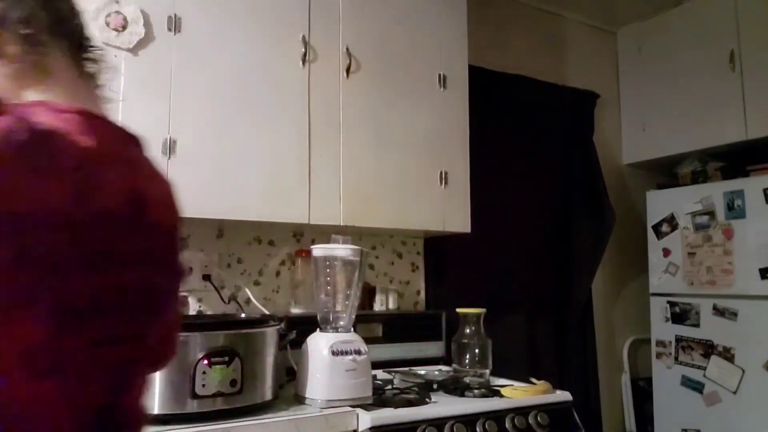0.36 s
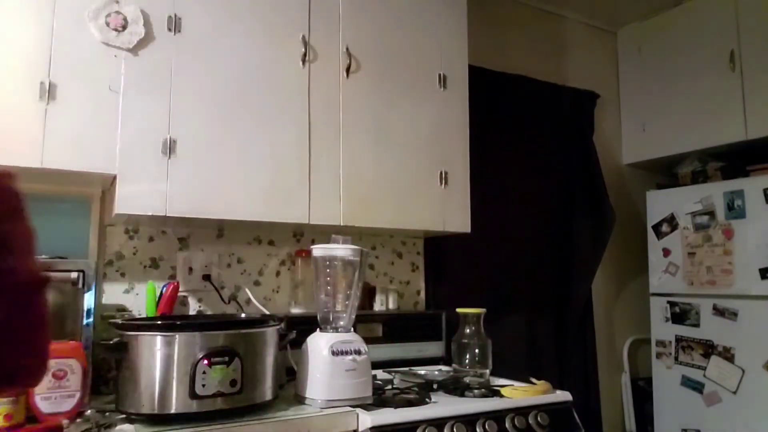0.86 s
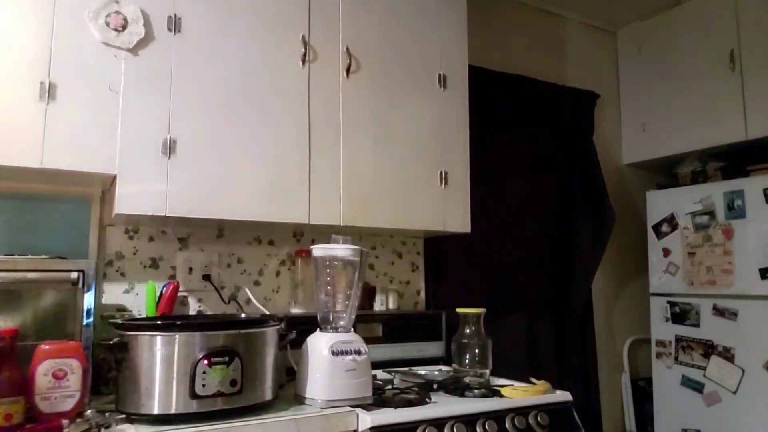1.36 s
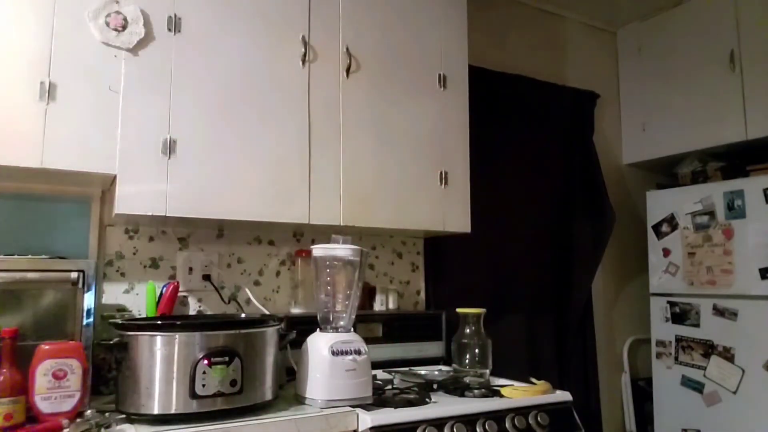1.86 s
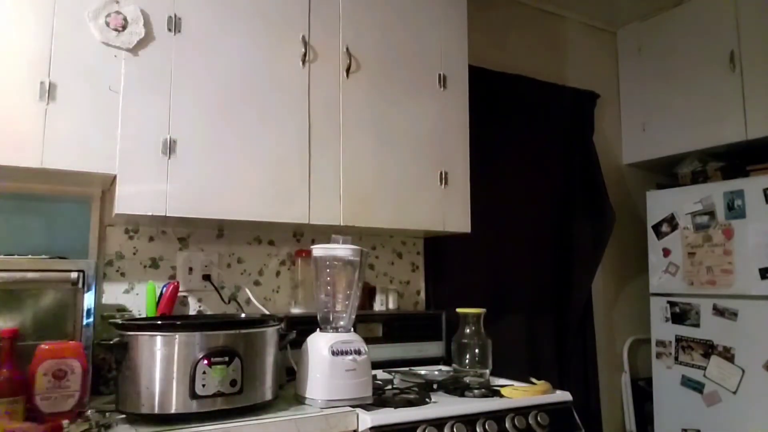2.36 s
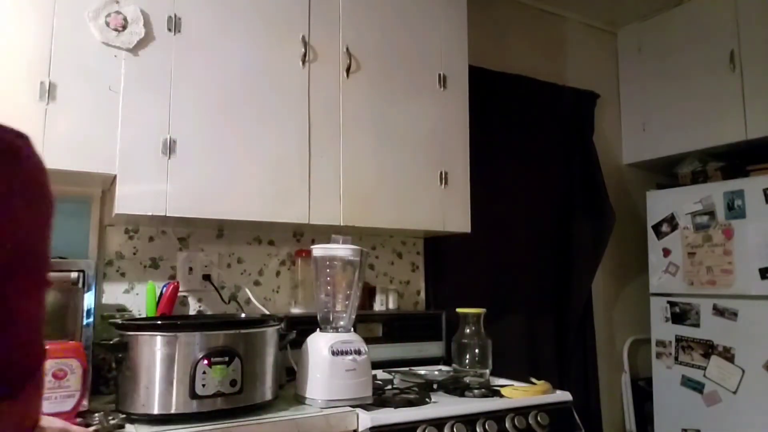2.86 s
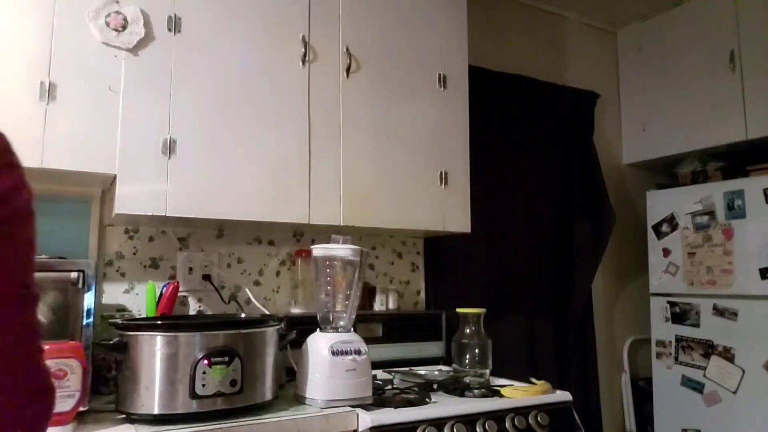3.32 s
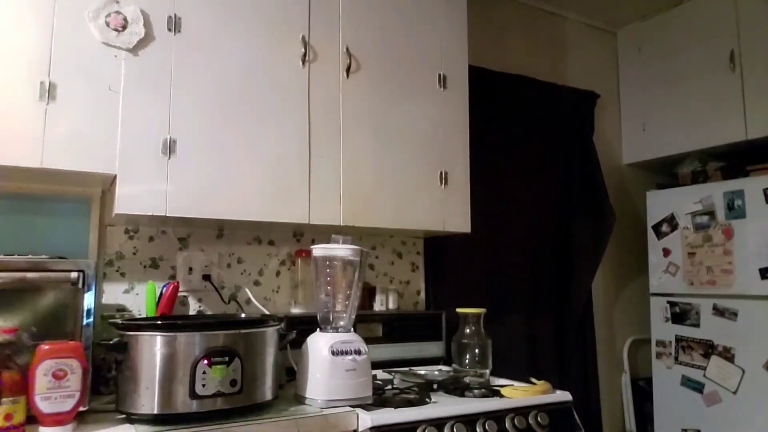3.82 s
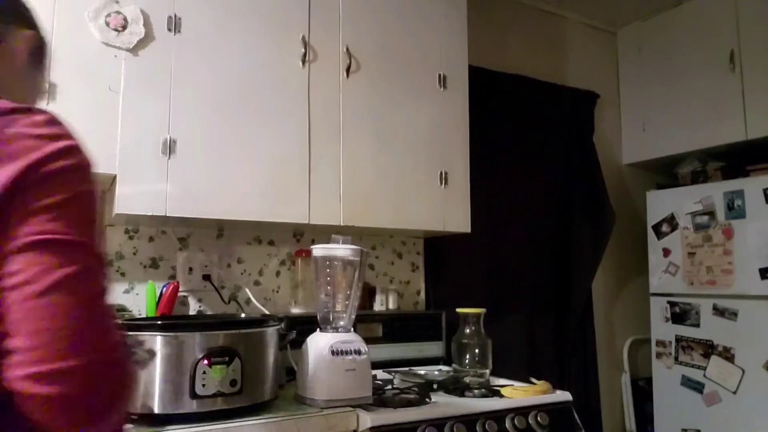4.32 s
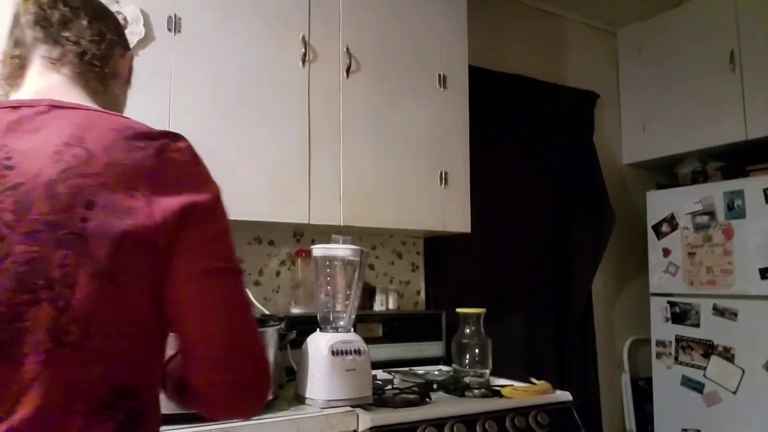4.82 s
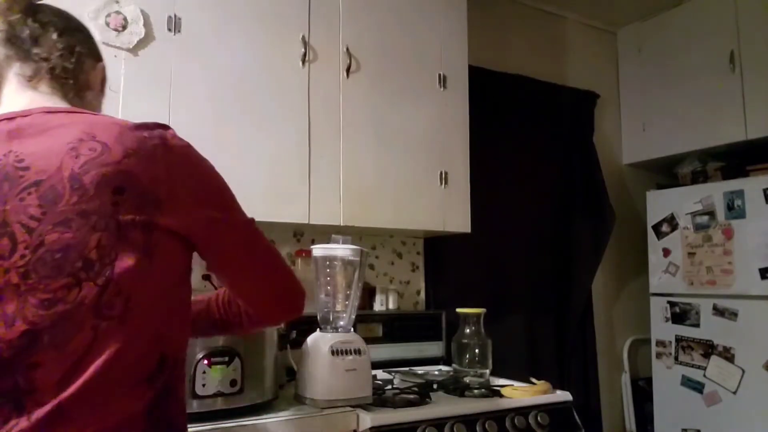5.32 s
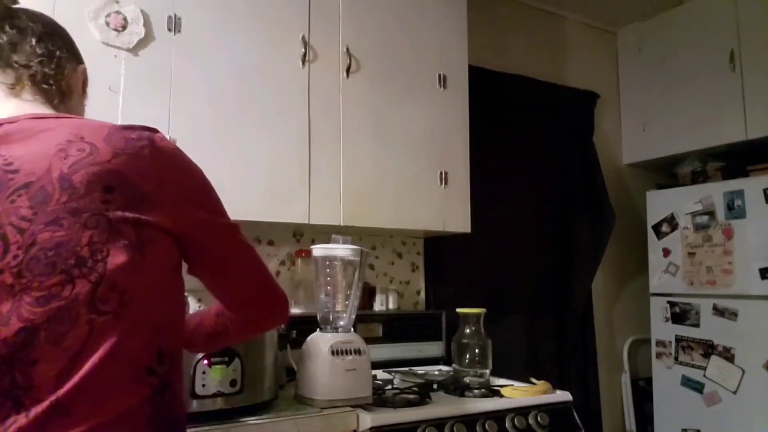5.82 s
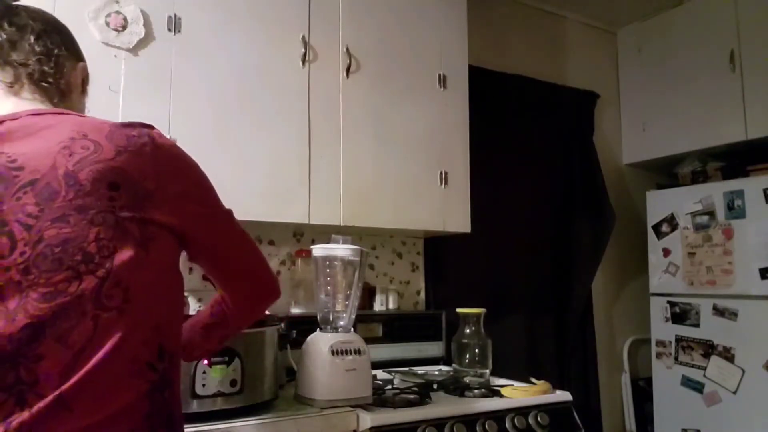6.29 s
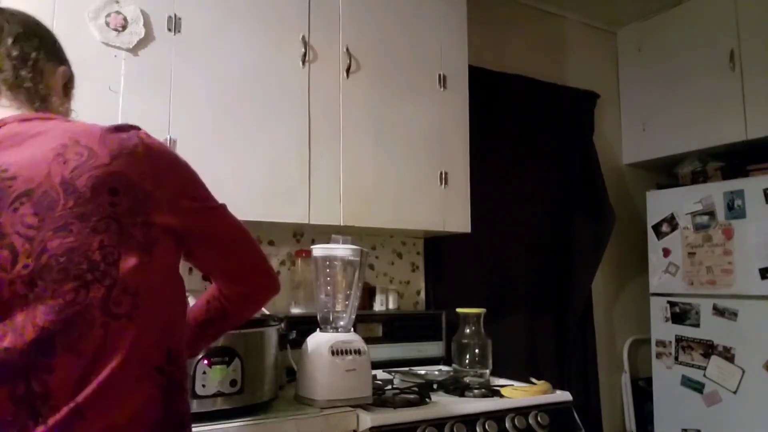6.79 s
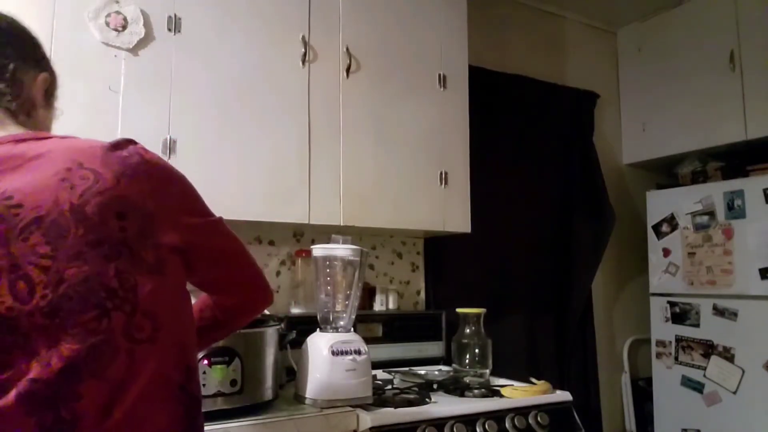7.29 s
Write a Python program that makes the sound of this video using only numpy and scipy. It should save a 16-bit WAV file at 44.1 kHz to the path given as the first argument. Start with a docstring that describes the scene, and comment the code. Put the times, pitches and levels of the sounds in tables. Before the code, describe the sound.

Close in a small kitchen, a dish is set down with a quick clatter, then a jar lands with a firm clunk. Plastic snaps and sleeves rustle. A door knocks dully twice, a lid clacks with a tiny squeak, and a wooden board takes a cluster of thuds. Quiet spoon ticks and soft slosh follow, then a metal pot is struck brightly, and a dish knocks at the end.

```python
"""A dish is set down with a run of knocks in a small kitchen, and a jar follows. Plastic snaps and dull
knocks of board and dish come throughout, with door knocks near 2.1 s, lid knocks, soft floor thumps and
spoon ticks among them, and a metal pot struck near 6.6 s. Each blow is a click and a dying wash of
noise, coloured by the object's resonances. Hands, sleeves and poured liquid rumble, slosh and rustle
as shaped noise, and one thin sine squeaks. Two spaced microphones hear it."""
import sys
import numpy as np
from scipy import signal
from scipy.fft import rfft, irfft
from scipy.io import wavfile
from scipy.ndimage import uniform_filter1d, map_coordinates

SR = 44100
rng = np.random.default_rng(int(sys.argv[2]) if len(sys.argv) > 2 else 0)


def amplitude_ratio(level_db):
    """Convert a level in decibels to the matching linear amplitude (field) ratio."""
    exponent = np.asarray(level_db, float) / 20
    return 10 ** exponent


def generate_wav(signal):
    """Clip the signal to [-1, 1] and save it as 16-bit WAV at the path in sys.argv[1]."""
    frames = np.transpose(np.atleast_2d(signal))
    scaled = np.clip(frames, -1, 1) * 32767
    pcm = np.round(scaled).astype(np.int16)
    wavfile.write(sys.argv[1], SR, pcm)


N = 337806  # length in samples

# Blows on jar, door, wood and pot, which also set the kitchen shuddering.
# Each row: start in seconds, thud gain in dB, clack in dB re thud, crack in dB re thud, sharpness 0-1.
JAR_BLOWS = [(0.865, -19.5, -39, -33, 1), (0.871, -18.5, -10, -20.5, 0.91), (0.893, -21.5, -9, -32.5, 1)]
DOOR_BLOWS = [(2.0978, -10, -46.5, -48, 0.89), (2.105, -11.5, -47, -51, 0.77), (2.15, -25, -19, -33, 0.44),
              (2.205, -23, -38, -37, 0.78), (2.226, -31, -49, -47, 0.23), (2.299, -35.5, -45, -35, 0.2)]
WOOD_BLOWS = [(1.529, -52, -2.5, -18, 0.4), (2.704, -53.5, -1, -32, 0.34), (2.716, -50, -0.5, -32.5, 0.53),
              (2.734, -50.5, -16, -17, 0.79), (3.71, -47.5, -13, -41, 0.59), (4.518, -18, -31, -32, 0.84),
              (4.533, -18.5, -33, -36, 0.68), (4.56, -27, -27, -43, 0.93), (4.585, -17.5, -10, -30.5, 0.74),
              (4.6, -22, -30, -51, 0.71), (4.687, -45.5, -14, -20, 0.26), (5.744, -53, -25.5, -35, 0.22),
              (6.37, -46, -14, -42, 0.1), (7.289, -53, -17, -24, 0.6), (7.425, -41, -35, -37, 0.24),
              (7.48, -40.5, -33, -25, 0.36)]
POT_BLOWS = [(6.578, -58, 5.5, -19, 0.85), (6.621, -16.5, 0, -3, 0.84), (6.628, -16.5, -6, -3.5, 0.74),
             (6.643, -19.5, -2.5, -6.5, 0.56)]


def unit(x):
    """Scaled to rms 1."""
    return x / np.sqrt(np.mean(x ** 2) + 1e-20)


def along(points, hz):
    """(Hz, value) points joined by straight lines on a log frequency axis."""
    f, v = np.transpose(points)
    return np.interp(np.log(hz + 1), np.log(f + 1), v)


def curves(rows):
    """One value per sample for each column after the time."""
    s, *cols = np.transpose(rows)
    return [np.interp(np.arange(N) / SR, s, c) for c in cols]


def wobble(rate):
    """A smooth random curve, rate knots a second."""
    knots = rng.standard_normal(int(N * rate / SR) + 4)
    return map_coordinates(knots, [np.arange(N) * rate / SR])


def resonance(hz, centre_hz, width_hz):
    """Causal response of one resonance, 1 at its top."""
    return 1j * hz * width_hz / (centre_hz ** 2 - hz ** 2 + 1j * hz * width_hz)


def pair(size, gain, win=256):
    """Stereo noise, cells weighted by gain(Hz, s), as alike at both microphones as a diffuse field."""
    # Likeness of the two microphones. Each row: frequency in Hz, left-right correlation.
    likeness = [(60, 0.87), (300, 0.89), (700, 0.53), (1200, -0.31), (3000, -0.029), (14000, -0.035)]
    hz, s, (a, b) = signal.stft(rng.standard_normal((2, size)), SR, nperseg=win)
    turn = np.arccos(np.clip(along(likeness, hz), -1, 1))[:, None] / 2
    mid, side = a * np.cos(turn), b * np.sin(turn)
    cells = np.array([mid + side, mid - side]) * gain(hz[:, None], s)
    return signal.istft(cells, SR, nperseg=win)[1][:, :size]


def knocks(rows, modes, broad_db, direct_db, strike_db, pan_db, clack_hz):
    """Each blow is a click and its dying wash round the room, heard through the object's resonances."""
    # Decay of the room at sharpness 0.5. Each row: frequency in Hz, t60 in seconds.
    room_decay = [(100, 0.23), (300, 0.25), (1000, 0.26), (4000, 0.32), (14000, 0.27)]
    # Low and high part of a contact. Each: centre in Hz, width in Hz.
    thud_band = (469, 1470)
    crack_band = (10570, 17000)
    soft_rise_s, hard_rise_s = 0.0064, 0.0024  # time constants at sharpness 0 and 1
    lag = 10  # delay between the microphones in samples

    size = SR * 3 // 4
    t = np.arange(size) / SR
    hz = np.fft.rfftfreq(size, 1 / SR)
    out = np.zeros((2, N + size))

    body = amplitude_ratio(broad_db)
    for k, (centre, width, db) in enumerate(modes):
        body = body + (-1) ** k * amplitude_ratio(db) * resonance(hz, centre, width)  # alternating sign
    clack_band = clack_hz, 0.99 * clack_hz  # the clack sits where the object is stiffest
    parts = []
    for band, order in ((thud_band, 3), (clack_band, 2), (crack_band, 3)):
        part = body * resonance(hz, *band) ** order
        parts.append(unit(abs(part)) * np.exp(1j * np.angle(part)))
    thud, clack, crack = parts

    for s, db, clack_db, crack_db, sharp in rows:
        rise = soft_rise_s * (hard_rise_s / soft_rise_s) ** sharp
        life = np.exp(1.26 * (.5 - sharp))  # a hard, damped contact dies sooner
        wash = pair(size, lambda hz, s: amplitude_ratio(-60 * s / (along(room_decay, hz) * life)))
        wash = wash * (1 + amplitude_ratio(direct_db - 60 * t / .02))  # early burst, 60 dB down in 20 ms
        wash = wash * (1 - np.exp(-t / rise))  # a soft contact swells
        # the straight path is a click, later at the right microphone
        wash[[0, 1], [0, lag]] += amplitude_ratio(strike_db) * np.exp(-rise / 0.0044)
        colour = thud + amplitude_ratio(clack_db) * clack + amplitude_ratio(crack_db) * crack
        heard = unit(irfft(rfft(wash) * colour, size))
        # the blow sets the energy, however the echoes fall
        energy = np.sqrt(np.mean(wash ** 2) * np.mean(abs(colour) ** 2))
        out[:, round(s * SR):][:, :size] += amplitude_ratio(db) * energy * heard
    return out[:, :N] * amplitude_ratio([[pan_db / 2], [-pan_db / 2]])


def dish():
    """A dish is set down and knocked again later: it rings with the counter in many narrow modes."""
    # Each row: start in seconds, thud gain in dB, clack and crack in dB re thud, sharpness 0-1.
    blows = [(0.0, -42, -11, -21, 0.73), (0.092, -34.5, -11.5, -36, 0.7), (0.104, -23, -9.5, -24, 0.05),
             (0.117, -19.5, -22, -29, 0.77), (0.133, -19.5, -8, -21, 0.5), (0.144, -19, -16.5, -19, 0.49),
             (0.16, -20, -7, -14.5, 1), (0.318, -31.5, -4, -17, 0.68), (0.485, -38.5, -23, -45, 1),
             (0.516, -49, -36, -60, 0.9), (2.915, -43.5, -40, -45, 0), (2.955, -39, -40, -45, 0.2),
             (2.983, -30.5, -54, -47, 0), (6.027, -48.5, -31, -41, 0.5), (6.049, -43.5, -20.5, -24, 0.7),
             (6.991, -46, -40, -29.5, 0.74), (7.026, -51, -46, -34, 0.8), (7.545, -35.5, -35, -30, 0.67),
             (7.556, -27, -24, -27.5, 0.72), (7.598, -42.5, -34, -20, 1)]
    # Resonances of dish and counter. Each row: centre in Hz, width in Hz, relative level in dB.
    modes = [(312, 24.5, 5), (338, 17, -11.5), (369, 18, -2.5), (423, 22, -8), (549, 7, -5.5),
             (1150, 22, -42), (1608, 66, -19), (1807, 97, -13.5), (2770, 84, -23.5), (3520, 140, -13),
             (4410, 220, -17.5), (4720, 43, -28), (5860, 410, -16.5), (6500, 190, -12), (7450, 220, -34)]
    return knocks(blows, modes, broad_db=-24, direct_db=10, strike_db=15.5, pan_db=0.5, clack_hz=1560)


def jar():
    """A jar is set down: its narrow high modes ring together with the counter under it."""
    # Resonances of jar and counter. Each row: centre in Hz, width in Hz, relative level in dB.
    modes = [(247, 110, -7), (350.3, 25, 6.5), (1340, 16, -35), (1793, 47, -8.5), (2160, 26, -27),
             (2519, 13, -16), (3150, 27, -13), (3300, 18, -16), (3600, 70, -24), (3940, 130, -24),
             (4090, 57, -26.5), (5820, 89, -12.5)]
    return knocks(JAR_BLOWS, modes, broad_db=-27.5, direct_db=4, strike_db=22.5, pan_db=0.0,
                  clack_hz=1930)


def door():
    """A door is knocked: low panel modes give a dull thud."""
    # Resonances of the door. Each row: centre in Hz, width in Hz, relative level in dB.
    modes = [(215, 20, -21.5), (277.5, 40, -1.5), (382, 50, -4.5), (445, 49, -2), (511, 24, -8),
             (582, 38, -3), (622, 130, -11.5), (867, 20, -13), (977, 49, -23), (1380, 76, -29),
             (1790, 140, -42)]
    return knocks(DOOR_BLOWS, modes, broad_db=-23.5, direct_db=1.5, strike_db=25.5, pan_db=1.0,
                  clack_hz=1100)


def board():
    """A wooden board is knocked: its low modes outweigh the broad high ones."""
    # Resonances of board and counter. Each row: centre in Hz, width in Hz, relative level in dB.
    modes = [(143, 20, -5), (220.6, 21.6, -5), (309, 33, -4), (386, 35, -4.5), (584, 84, -14),
             (953, 125, -12.5), (1112, 114, -16), (1473, 30, -15), (2260, 120, -25), (3520, 140, -36)]
    return knocks(WOOD_BLOWS, modes, broad_db=-25, direct_db=9.5, strike_db=18, pan_db=-0.8,
                  clack_hz=1326)


def pot():
    """A metal pot is struck: low modes ring under broad, bright high ones."""
    # Resonances of pot and counter. Each row: centre in Hz, width in Hz, relative level in dB.
    modes = [(156.4, 22, -5.5), (305, 17, -6), (397, 27, -6), (441, 23, -7.5), (589.6, 26, -1.5),
             (1143, 35, -5), (2340, 750, -6), (3090, 470, -6.5), (4100, 830, -12), (5900, 610, -12.5),
             (6780, 360, -18.5)]
    return knocks(POT_BLOWS, modes, broad_db=-24.5, direct_db=8, strike_db=1.0, pan_db=-1.0,
                  clack_hz=2470)


def lid():
    """A lid is knocked: a few low modes with weaker ones above."""
    # Each row: start in seconds, thud gain in dB, clack and crack in dB re thud, sharpness 0-1.
    blows = [(3.037, -25.5, -16.5, -33, 0.69), (3.088, -41.5, -37, -41, 0.1),
             (3.212, -22, -13.5, -16, 0.78), (3.224, -27.5, -11.5, -13, 0.44),
             (5.787, -35.5, -17, -30, 0.25), (7.195, -43, -13, -13.5, 0.26)]
    # Resonances of the lid. Each row: centre in Hz, width in Hz, relative level in dB.
    modes = [(332, 24, -6.5), (445, 24, -3.5), (556, 44, -4), (650, 40, -3), (980, 610, -18.5),
             (1630, 880, -11.5), (2730, 86, -17), (3340, 330, -9.5)]
    return knocks(blows, modes, broad_db=-17.0, direct_db=8, strike_db=27.5, pan_db=0.8, clack_hz=1330)


def spoon():
    """A spoon ticks: narrow modes spread up through the treble."""
    # Each row: start in seconds, thud gain in dB, clack and crack in dB re thud, sharpness 0-1.
    blows = [(5.834, -39, 0, -12.5, 0.6), (5.843, -38.5, -16, -18, 0.86), (5.878, -57, -7, -1.5, 0.3),
             (6.159, -55.5, -29, -12, 0.9), (6.509, -52, -27, -13.5, 0.7)]
    # Resonances of the spoon. Each row: centre in Hz, width in Hz, relative level in dB.
    modes = [(280, 23, -4), (788, 29.7, -15), (1125, 60, -5), (1673, 31, -7), (2216, 14, -11),
             (3020, 31, -15), (4290, 26, -13), (5400, 30, -14)]
    return knocks(blows, modes, broad_db=-31.5, direct_db=11, strike_db=15, pan_db=0.0, clack_hz=1800)


def plastic():
    """Plastic snaps: wide, heavily damped modes colour each short click."""
    # Each row: start in seconds, thud gain in dB, clack and crack in dB re thud, sharpness 0-1.
    snaps = [(0.585, -57, -30, 6.5, 0.77), (0.649, -43.5, -3.5, -18, 0.87), (1.043, -48.5, 2.5, -7, 0.81),
             (1.119, -53.5, -10, -2, 0.5), (1.243, -44.5, -33, -9, 0.68), (1.849, -58, -20, 2.5, 0.93),
             (2.869, -54.5, -33, -1, 0.54), (3.759, -51.5, -36, -25, 0.45), (5.402, -61, 14.5, 11, 0.58),
             (6.028, -51, -35, -5, 0.55), (6.299, -66.5, -35, 5.5, 0.91), (6.469, -58.5, -27, 0, 0.87),
             (7.064, -55, -31, -12, 0.52)]
    # Resonances of the plastic. Each row: centre in Hz, width in Hz, relative level in dB.
    modes = [(300, 93, -14.5), (2330, 950, -2.5), (3050, 560, 0), (4600, 960, -1), (5900, 620, -9)]
    return knocks(snaps, modes, broad_db=-14.5, direct_db=-14, strike_db=24.5, pan_db=-0.5,
                  clack_hz=3500)


def floor_thumps():
    """Soft footfalls or bumps come through the floor, which answers with three deep modes."""
    # Each row: start in seconds, thud gain in dB, clack and crack in dB re thud, sharpness 0-1.
    thumps = [(2.475, -45, -49.5, -60, 1), (4.168, -50, -50, -60, 0.7), (5.849, -35, -50, -60, 1)]
    # Resonances of the floor. Each row: centre in Hz, width in Hz, relative level in dB.
    modes = [(70, 32, -4.5), (135, 49, -0.5), (200, 57, -12.5)]
    return knocks(thumps, modes, broad_db=-49, direct_db=7.5, strike_db=15, pan_db=0.0, clack_hz=1000)


def squeak():
    """Something rubbed squeaks briefly: one thin gliding sine with soft ends."""
    # Each row: time in seconds, frequency in Hz, peak level in dB.
    glide = [(3.13, 3450, -79.5), (3.14, 3600, -59.5), (3.148, 3630, -54.5), (3.186, 3628, -58),
             (3.205, 3600, -61)]
    hz, db = curves(glide)
    t = np.arange(N) / SR
    gate = np.clip(np.minimum(t - glide[0][0], glide[-1][0] - t) / .008, 0, 1)  # 8 ms ramps
    return gate * amplitude_ratio(db) * np.sin(2 * np.pi * np.cumsum(hz) / SR)


def bed(spectrum, patchy_db, grain_db, grains):
    """Noise of rms 1 in drifting patches, its level broken into grains (knots a second)."""
    def gain(hz, s):
        field = rng.standard_normal((len(hz), len(s)))
        field = uniform_filter1d(field, size=3, axis=0)  # across frequency
        field = uniform_filter1d(field, size=8, axis=1)  # across time
        return amplitude_ratio(along(spectrum, hz) + patchy_db * unit(field))
    return unit(amplitude_ratio(grain_db * wobble(grains)) * pair(N, gain, win=1024))


def swells(events, fall):
    """Power of (s, rise s, dB) swells, straight in dB up and down; rise and fall in s per 20 dB."""
    t = np.arange(N) / SR
    power = 0
    for s, rise, db in events:
        rise = max(rise, 1 / SR)  # zero or negative: starts at once
        drop_20db = np.where(t < s, (s - t) / rise, (t - s) / fall)
        power = power + amplitude_ratio(db - 20 * drop_20db) ** 2
    return power


def shudder(db, t60):
    """Counter and cupboards shudder on after each jar, door, wood or pot blow: power, db re its thud."""
    blows = JAR_BLOWS + DOOR_BLOWS + WOOD_BLOWS + POT_BLOWS
    return swells([(s, 0, blow_db + db) for s, blow_db, *_ in blows], fall=t60 * 20 / 60)


def handling():
    """Floor rumble, slosh and slide on the counter, scraping, rustle of cloth and liquid: shaped noise."""
    # Slow movement, low part. Each row: time in seconds, rumble in dB, slosh in dB.
    moving = [(0.0, -54, -51.5), (0.1, -59, -50), (0.28, -60, -43), (0.45, -65.5, -48.5),
              (0.62, -61, -50.5), (0.83, -69, -50.5), (1.25, -61, -57), (1.8, -66, -58.5),
              (2.0, -64.5, -56), (2.65, -71, -55.5), (3.2, -64, -46), (3.5, -61, -56.5),
              (3.85, -56.5, -53.5), (4.4, -60.5, -56), (5.1, -62, -57), (5.3, -61, -56), (5.65, -62.5, -60),
              (6.0, -59, -56), (6.4, -59, -50.5), (6.57, -60.5, -53), (7.1, -66, -57), (7.27, -56, -52),
              (7.66, -60.5, -52)]
    # Slow movement, high part. Each row: time in seconds, scrape in dB, rustle in dB.
    rubbing = [(0.0, -62, -68), (0.2, -70, -57.5), (0.4, -63, -79), (0.56, -72, -83), (0.7, -60.5, -72),
               (0.83, -60.5, -88), (1.35, -62, -63), (1.6, -69.5, -71.5), (2.0, -61, -63),
               (2.6, -67.5, -71.5), (2.96, -58.5, -66.5), (3.3, -66, -66), (3.6, -68.5, -74.5),
               (3.85, -64, -66), (4.35, -70, -66), (4.85, -75, -74), (5.1, -74.5, -76), (5.35, -66.5, -72),
               (5.67, -76, -77), (5.95, -70, -69.5), (6.5, -64, -70), (7.1, -69, -70), (7.66, -61, -64.5)]
    # Something heavy slides and sloshes up to a bump.
    # Each row: loudest at seconds, rise in seconds per 20 dB, slosh in dB, rumble in dB, scrape in dB.
    slide_rows = [(2.99, 0.03, -48, -75, -65), (5.839, 0.15, -43.5, -49, -70),
                  (7.55, 0.5, -40.5, -65, -53.5)]
    # A sleeve or packet is brushed.
    # Each row: loudest at seconds, rise in seconds per 20 dB, rustle in dB, scrape in dB.
    brush_rows = [(0.62, -0.5, -61, -55), (0.94, -0.2, -76, -54), (1.11, 0.06, -56, -53),
                  (1.21, 3, -52, -58.5), (1.86, 0.15, -56, -64), (4.63, 0.24, -60.5, -54.5),
                  (5.27, 0.02, -72, -66)]
    # Spectra of the four noises. Each row: frequency in Hz, relative level per Hz in dB.
    rumble_spectrum = [(15, -64), (25, -22), (54, -2), (91, -11.5), (150, 0.5), (200, -31.5), (330, -120)]
    slosh_spectrum = [(65, -34.5), (110, -9.5), (145, -14.5), (237, 7), (269, -6.5), (315, 5), (355, -4),
                      (539, -10.5), (1000, -24), (1300, -51.5), (2200, -120)]
    scrape_spectrum = [(470, -16.5), (800, 3), (979, -11.5), (1100, 6), (1450, -5), (1780, 0),
                       (4500, -12.5), (5850, -36), (9900, -120)]
    rustle_spectrum = [(2060, -16), (3500, -1), (4950, 0.5), (9680, -3.5), (11400, 2), (13900, -4),
                       (14700, -14), (15000, -21.5)]

    rumble_db, slosh_db = curves(moving)
    scrape_db, rustle_db = curves(rubbing)
    slide_slosh, slide_rumble, slide_scrape = (
        swells([(s, rise, dbs[k]) for s, rise, *dbs in slide_rows], fall=0.13) for k in range(3))
    brush_rustle, brush_scrape = (
        swells([(s, rise, dbs[k]) for s, rise, *dbs in brush_rows], fall=0.18) for k in range(2))

    # powers add
    rumble = amplitude_ratio(rumble_db) ** 2 + slide_rumble + shudder(db=-39, t60=2.57)
    slosh = amplitude_ratio(slosh_db) ** 2 + slide_slosh + shudder(db=-27.5, t60=1.15)
    scrape = amplitude_ratio(scrape_db) ** 2 + slide_scrape + brush_scrape + shudder(db=-42, t60=0.33)
    rustle = amplitude_ratio(rustle_db) ** 2 + brush_rustle
    return (np.sqrt(rumble) * bed(rumble_spectrum, patchy_db=3.5, grain_db=0.0, grains=27)
            + np.sqrt(slosh) * bed(slosh_spectrum, patchy_db=3.0, grain_db=2.5, grains=14)
            + np.sqrt(scrape) * bed(scrape_spectrum, patchy_db=4.5, grain_db=1.0, grains=73)
            + np.sqrt(rustle) * bed(rustle_spectrum, patchy_db=0.5, grain_db=2.0, grains=140))


def scene():
    """All sources at the two microphones."""
    set_down = dish() + jar()
    knocked = door() + board() + pot() + lid() + spoon()
    small = plastic() + squeak()
    return set_down + knocked + small + floor_thumps() + handling()


def low_pass(x):
    """Removes everything above the highest recorded frequency."""
    return signal.sosfilt(signal.butter(12, 15440, fs=SR, output="sos"), x)


def record(dry):
    """The microphones lose the deepest bass and the top treble."""
    low = signal.butter(2, 55, "highpass", fs=SR, output="sos")
    top = signal.ellip(8, .5, 45, 14700, fs=SR, output="sos")
    mix = signal.sosfilt(np.vstack([low, top]), dry)
    return low_pass(mix)


dry = scene()
out = record(dry)
generate_wav(out)
```